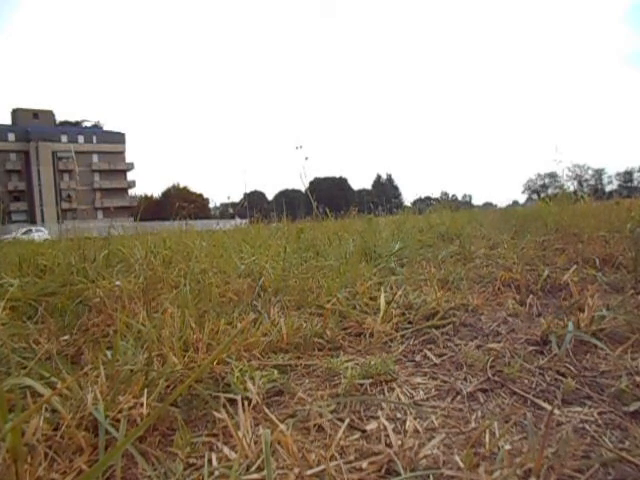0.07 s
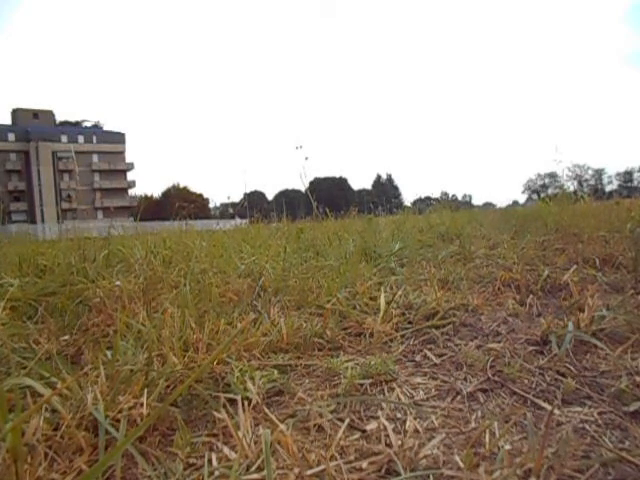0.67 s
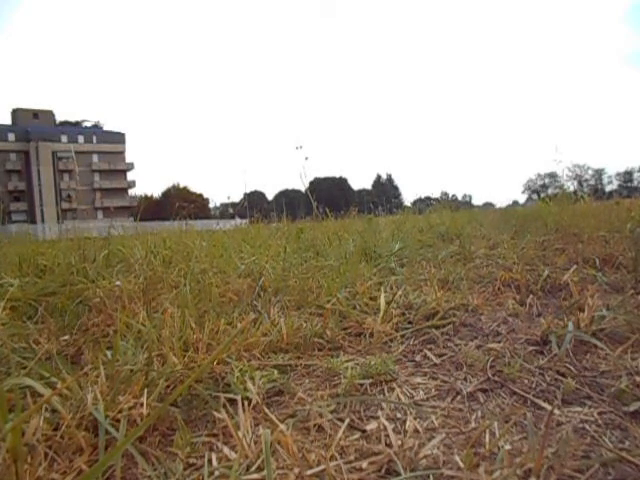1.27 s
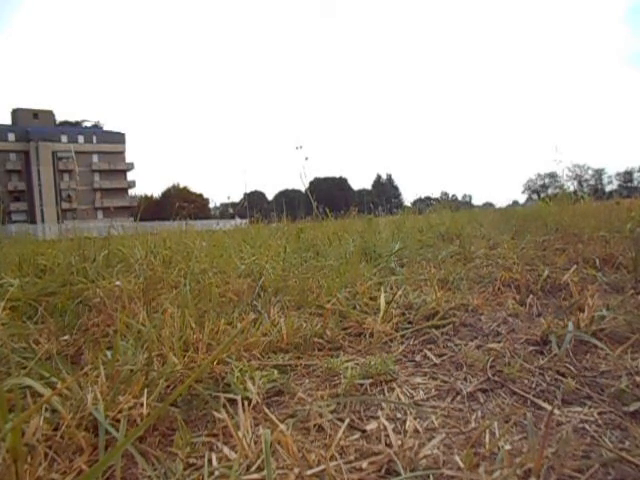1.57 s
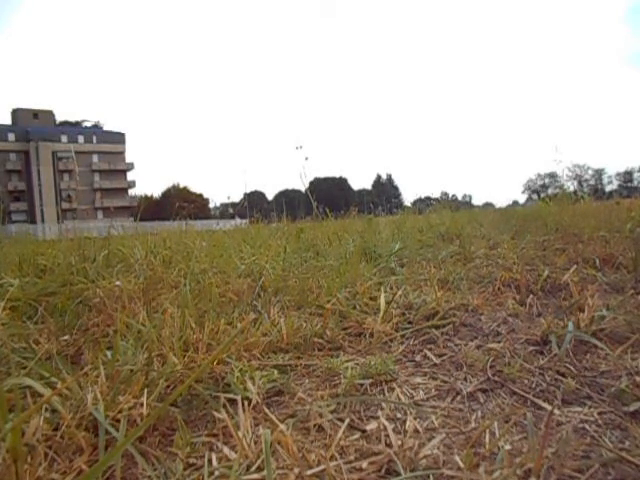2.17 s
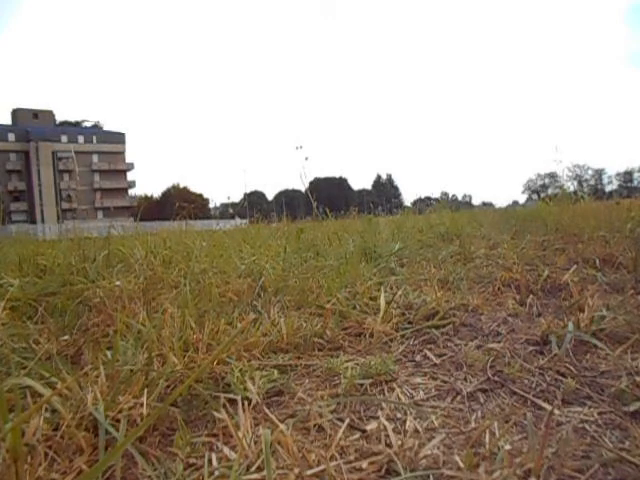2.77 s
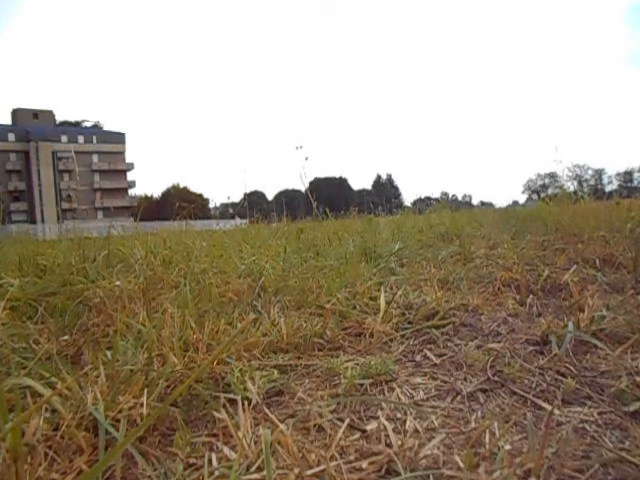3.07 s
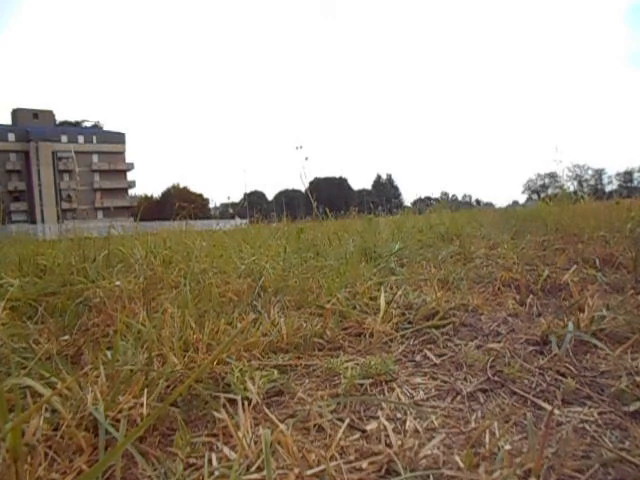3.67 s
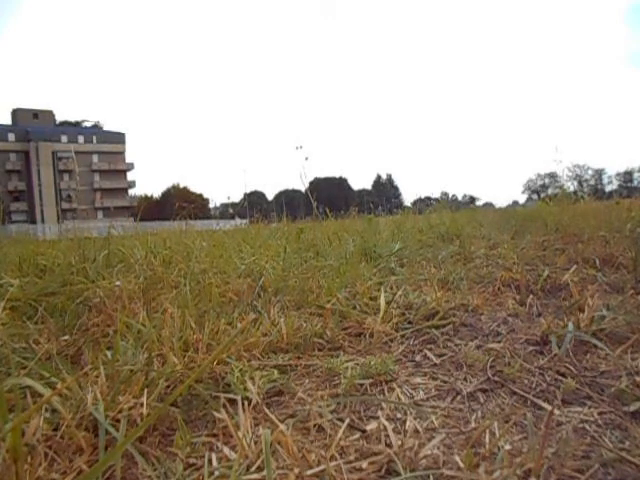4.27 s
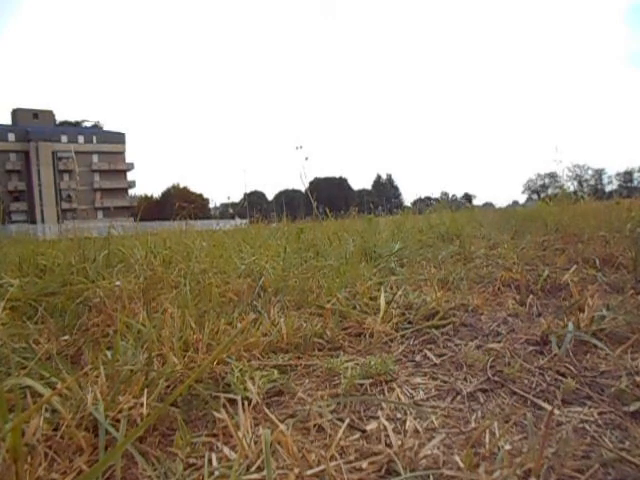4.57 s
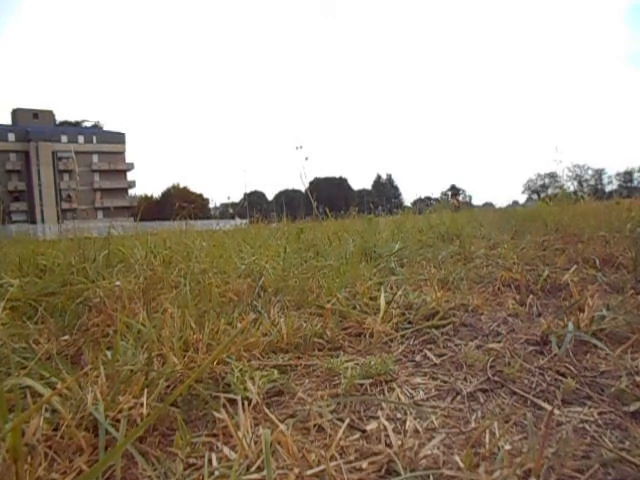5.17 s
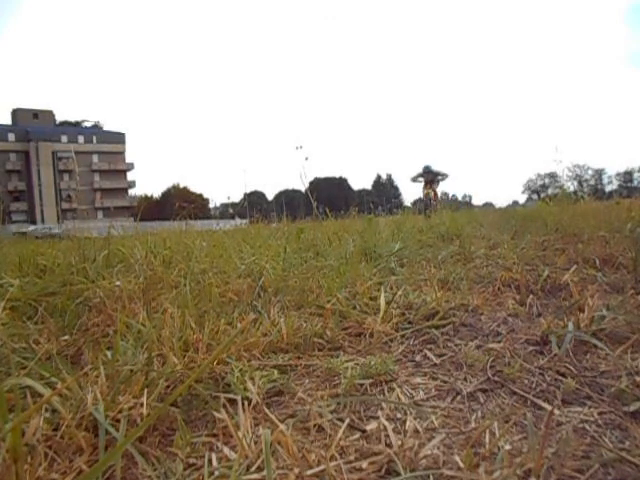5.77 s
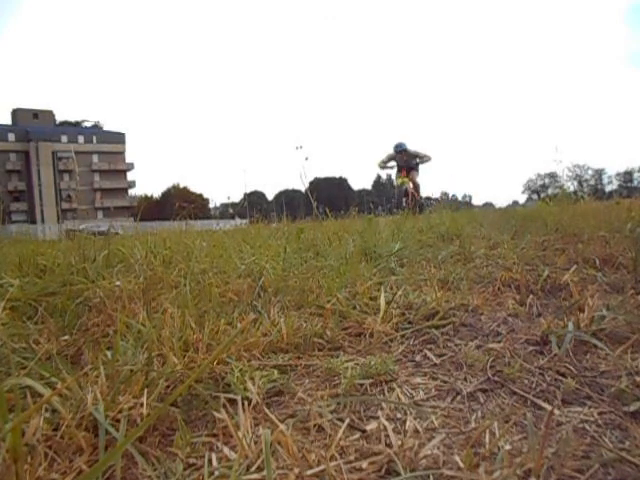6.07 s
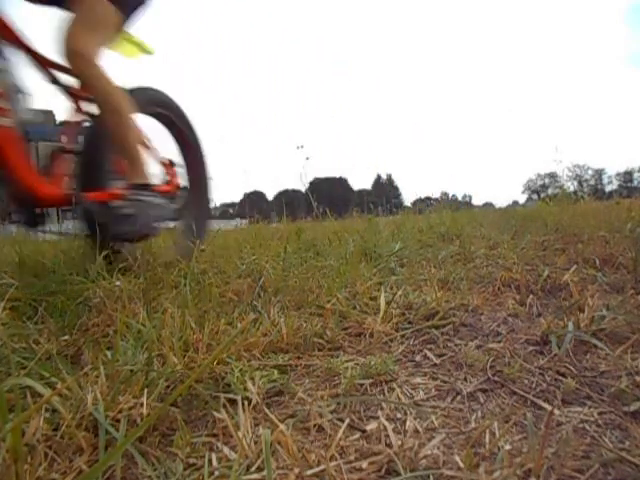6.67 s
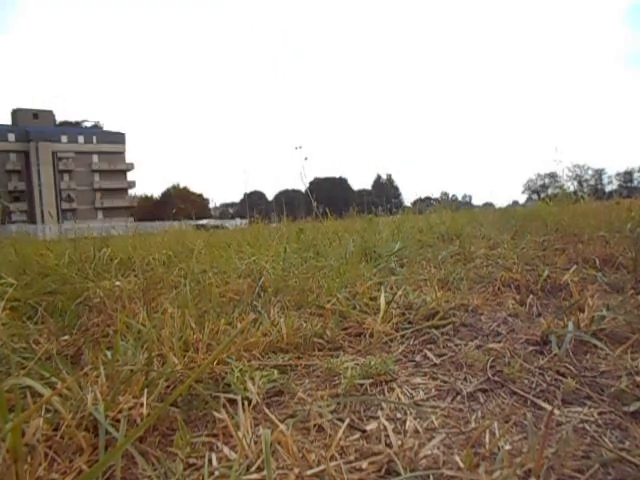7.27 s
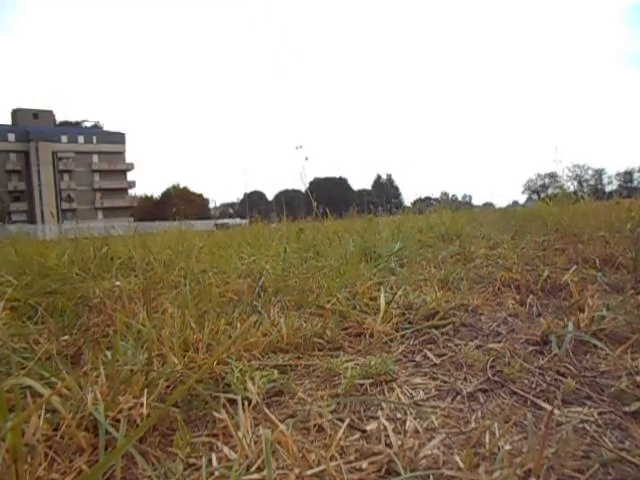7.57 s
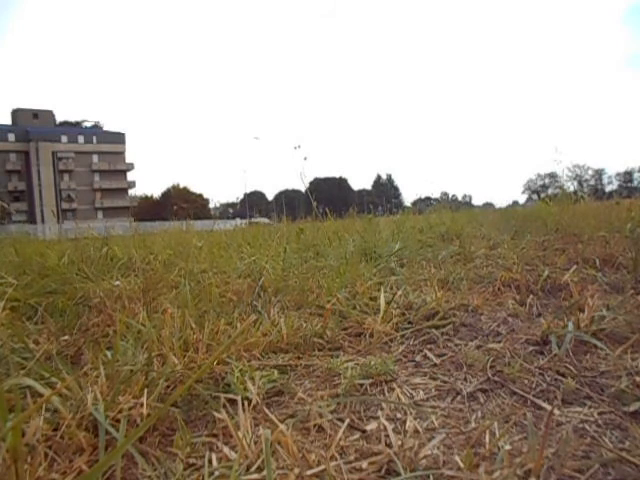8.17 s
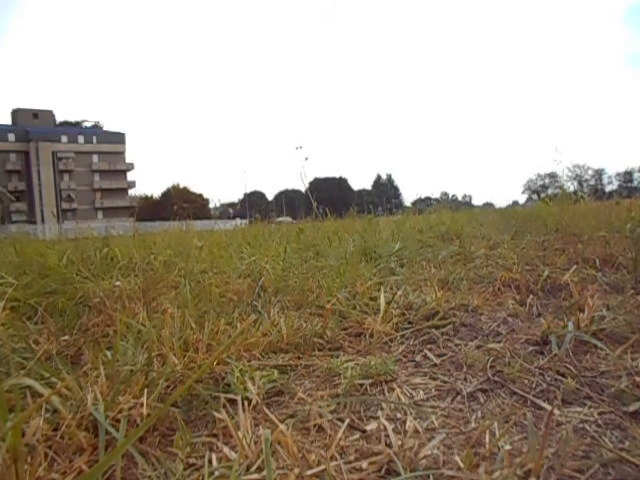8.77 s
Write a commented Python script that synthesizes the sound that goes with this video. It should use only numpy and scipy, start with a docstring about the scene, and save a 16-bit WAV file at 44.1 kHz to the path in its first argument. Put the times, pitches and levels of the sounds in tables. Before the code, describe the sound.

Far traffic and a light breeze in a field, then a bike crunches past through dry grass and rattles away.

```python
"""A field of dry grass, heard from the ground: a fat-tyred bicycle passes right beside the microphone.
Blades swish and crackle under the wheels, the air in the tyres hums, stalks snap and the freewheel ticks;
then a bump sets the frame and chain clattering and the bike is pedalled away.
Far traffic hisses and rumbles throughout under a light breeze; small gusts buffet the microphone
after the pass."""
import sys
import numpy as np
from scipy import signal
from scipy.fft import rfft, irfft, next_fast_len
from scipy.io import wavfile

SR = 44100
rng = np.random.default_rng(int(sys.argv[2]) if len(sys.argv) > 2 else 0)


def output_pcm(signal):
    """Save a mono or channel-first signal as 16-bit PCM at the path in sys.argv[1].

    Samples are clipped to [-1, 1] before scaling.
    """
    pcm = np.clip(np.atleast_2d(signal).T, -1, 1) * 32767
    wavfile.write(sys.argv[1], SR, np.round(pcm).astype(np.int16))


N = 397782


def from_db(db):
    """Decibels to gain."""
    return 10 ** (np.asarray(db) / 20)


def rms_one(x):
    """Scale to unit power."""
    return x / np.sqrt(np.mean(x ** 2) + 1e-20)


def seconds():
    """The time of every sample."""
    return np.arange(N) / SR


def ramp(start_s, length_s):
    """A straight fade from 0 to 1."""
    return np.clip((seconds() - start_s) / length_s, 0, 1)


def hump(s, half_s):
    """A bell envelope of height 1; its half length is one standard deviation."""
    return np.exp(-.5 * np.minimum(((seconds() - s) / half_s) ** 2, 100))


def swell(full_s, until_s, rise_db_per_s, fall_db_per_s):
    """Attack, hold and release, in dB relative to the held level."""
    t = seconds()
    return -rise_db_per_s * np.maximum(full_s - t, 0) - fall_db_per_s * np.maximum(t - until_s, 0)


def dying(t60):
    """Half a second of decay, falling 60 dB in t60 seconds."""
    return from_db(-60 * np.arange(SR // 2) / SR / max(t60, .001))


def noise(samples=N):
    """White noise."""
    return rng.standard_normal(samples)


def drift(rate):
    """A random modulator with about `rate` turns a second."""
    knots = noise(N // 20)
    return np.interp(seconds() * 2 * rate, np.arange(len(knots)), knots)


def crackle(per_s, spread_db, grain_s, smooth):
    """Tiny random bursts, each of its own size, over the smooth hiss of countless others."""
    sizes = from_db(spread_db * np.minimum(rng.exponential(1, N), 3.3))
    grains = sizes * (rng.random(N) < per_s / SR)
    power = signal.lfilter([1], [1, -np.exp(-1 / (grain_s * SR))], grains ** 2 + 1e-18)
    return noise() * np.sqrt(power / power.mean() + smooth ** 2)


def coloured(x, spectrum):
    """Shape a texture with an EQ curve; rms 1."""
    hz, db = np.transpose(spectrum)
    size = next_fast_len(N)
    grid = np.maximum(np.fft.rfftfreq(size, 1 / SR), 1)
    eq = from_db(np.interp(np.log(grid), np.log(hz), db))
    return rms_one(irfft(rfft(x, size) * eq, size)[:N])


def cut(x, hz, kind, order=2):
    """Butterworth low- or high-pass."""
    return signal.sosfilt(signal.butter(order, min(hz, SR / 2 - 100), kind, fs=SR, output="sos"), x)


def resonate(x, hz, width):
    """A resonance with gain 1 at its peak."""
    r = np.exp(-np.pi * width / SR)
    poles = [1, -2 * r * np.cos(2 * np.pi * hz / SR), r * r]
    return signal.lfilter(np.array([1, 0, -1]) * (1 - r * r) / 2, poles, x + 1e-18)


def band(x, hz, width):
    """The same resonance twice, for steeper skirts; rms 1."""
    return rms_one(resonate(resonate(x, hz, width), hz, width))


def body(x, modes):
    """Parallel resonances of alternating sign."""
    return sum((-1) ** k * from_db(db) * resonate(x, hz, width)
               for k, (hz, width, db) in enumerate(modes))


def add(out, s, sound):
    """Mix a sound in at a time."""
    at = int(s * SR)
    out[at:at + len(sound)] += sound[:N - at]


# EQ of the road's low rumble and of its tyre hiss: (frequency [Hz], level [dB])
RUMBLE_EQ = [(26, -34), (45, -2), (96, -9), (118, -6), (243, -5), (332, -10), (413, -9.5), (606, -17.5),
             (800, -28), (1040, -52), (1760, -120)]
ROAD_HISS_EQ = [(410, -23), (700, -11.5), (1080, -6.5), (1730, -7), (1850, -5.5), (2020, -6.5), (2940, -7),
                (3290, -7.5), (5850, -14.5), (7170, -15), (10400, -18), (13500, -57), (22000, -120)]
# A far car lifts the hiss: (time [s], boost [dB], half length [s])
CAR_SWELLS = [(3.4, 2, 0.77)]
# Drone of a far engine: (frequency [Hz], level [dB])
ENGINE_PARTIALS = [(37.7, -56.5), (75.4, -63.5), (118.4, -61.5)]


def traffic():
    """Rumble and tyre hiss of a far road swell and ebb, with the wavering low notes of an engine."""
    rumble_db = -52 + swell(full_s=2.75, until_s=3.7, rise_db_per_s=2.5, fall_db_per_s=1.5)
    cars_db = sum(db * hump(s, half) for s, db, half in CAR_SWELLS)
    hiss_db = -52 + cars_db - 2.24 * ramp(4.5, length_s=2.0)
    rumble = from_db(rumble_db + 1.23 * drift(5.6)) * coloured(noise(), RUMBLE_EQ)
    hiss = from_db(hiss_db) * coloured(noise(), ROAD_HISS_EQ)
    engine = np.zeros(N)
    for hz, db in ENGINE_PARTIALS:
        phase = 2 * np.pi * np.cumsum(hz * (1 + 0.0304 * drift(4.4))) / SR
        engine += from_db(db + 2.2 * drift(1.8)) * np.sin(phase)
    return rumble + hiss + engine


# EQ of the breeze's sizzle and of the low buffeting: (frequency [Hz], level [dB])
BREEZE_EQ = [(1500, -21), (2500, -14), (3300, -2.5), (4000, -1.5), (4800, -2.5), (5600, -10.5), (6600, -25),
             (10000, -28), (14000, -15.5)]
BUFFET_EQ = [(15, 9), (35, 3.5), (70, -4.5), (150, -7), (300, -15), (700, -66)]
# Gusts on the microphone: (time [s], level [dB], half length [s])
GUST_CUES = [(6.766, -43, .04), (6.87, -41.5, 0.036), (7.044, -49, 0.059), (7.85, -43.5, 0.042),
             (7.94, -47, 0.054), (8.1, -41, 0.022), (8.276, -51, 0.08), (8.555, -48.5, 0.04),
             (8.727, -51, .03), (8.835, -48.5, 0.046)]


def wind():
    """The breeze rises and dies in the field; gusts and the bike's wake buffet the microphone."""
    breeze_db = -52.5 + swell(full_s=1.7, until_s=4.24, rise_db_per_s=2.0, fall_db_per_s=3.0)
    sizzle = from_db(breeze_db + 0.73 * drift(11)) * coloured(noise(), BREEZE_EQ)
    draught = from_db(-61)
    gusts = sum(from_db(db) * hump(s, half) for s, db, half in GUST_CUES)
    eddies = from_db(2.5 * drift(20))
    return sizzle + (draught + gusts) * eddies * coloured(noise(), BUFFET_EQ)


# The pass-by: a straight line at steady speed, the front wheel nearest at PASS_S
PASS_S, SPEED_M_PER_S, WHEELBASE_M, NEAREST_M = 6.672, 6.5, 1.31, 0.97
ROUGH_FROM_S, ROUGH_TO_S, SOFT_TURF_DB = 6.58, 7.46, -5   # a rough stretch, then quieter turf


def travelled():
    """Metres that the front and the rear wheel have gone past the microphone."""
    front = SPEED_M_PER_S * (seconds() - PASS_S)
    return np.array([front, front - WHEELBASE_M])


def nearness(loss_db):
    """Gain of each wheel: 1 at its nearest, down by loss_db per tenfold distance over the grass."""
    distance_m = np.hypot(travelled(), NEAREST_M)
    return from_db(-loss_db * np.log10(distance_m / NEAREST_M))


def both_wheels(loss_db, front_db=0):
    """The two wheels add in power; front_db trims the front one, which bears less weight."""
    front, rear = nearness(loss_db)
    return np.hypot(from_db(front_db) * front, rear)


def behind():
    """Fade from 0 to 1 as the bike moves behind the microphone, where its sound is shaded."""
    return ramp(6.79, length_s=0.16)


def thin_patch_db():
    """A brief dip in level where the grass is thinner."""
    return -3.5 * hump(6.688, half_s=.022)


# EQ of the swish, bright ahead and hollow behind: (frequency [Hz], level [dB])
BRIGHT_SWISH_EQ = [(1180, -31), (2000, -13.5), (2860, -9), (3670, -6.5), (6600, -9), (8690, -1.5),
                   (9910, -4.5), (10400, -7.5), (13500, 4.5), (22000, -120)]
HOLLOW_SWISH_EQ = [(1180, -13), (2000, -26), (2640, -3), (2840, -6), (3360, 1), (3900, 1.5), (4230, 3),
                   (4610, 3), (5400, -2), (6100, -4), (6450, -14), (7120, 0), (8000, -7), (9380, 1),
                   (10400, -2), (13500, -19), (22000, -120)]
# The wheels plough through thicker tufts: (time [s], boost [dB], half length [s])
TUFT_SWELLS = [(4.036, 10, 0.042), (6.18, 3, 0.073), (6.413, 2, 0.033), (6.5, 2.5, 0.042),
               (6.735, 4.5, 0.05), (6.818, 2, 0.032), (6.97, 5, 0.066), (7.197, 1.5, .05), (7.638, 6, 0.11),
               (8.287, 8, 0.099)]


def grass():
    """Blades whip the tyres and spokes; the colour turns hollow once the bike is behind the microphone."""
    tufts_db = sum(db * hump(s, half) for s, db, half in TUFT_SWELLS)
    swish_db = -23 - 10.5 * behind() + tufts_db + thin_patch_db()
    blades = crackle(per_s=2200, spread_db=3.7, grain_s=.0003, smooth=.95)
    bright = from_db(3.5) * coloured(blades, BRIGHT_SWISH_EQ)
    hollow = from_db(0.5) * coloured(blades, HOLLOW_SWISH_EQ)
    hollow_share = 0.57 * behind()
    swish = (1 - hollow_share) * bright + hollow_share * hollow
    return from_db(swish_db + drift(36)) * both_wheels(loss_db=33) * swish


# EQ of crunching straw: (frequency [Hz], level [dB])
STRAW_EQ = [(400, -33), (800, -7), (1300, -5.5), (2200, -8.5), (3500, -16), (5200, -10), (6600, -18),
            (8500, -11)]
# Resonances of the tyre casing: (frequency [Hz], bandwidth [Hz], level [dB])
CASING_MODES = [(85, 58, -12.5), (292, 185, -10), (402, 257, -6), (488, 210, -6), (637, 480, -12.5)]


def tyres():
    """The tread crushes straw and drums on the uneven soil, which sounds the casing."""
    uneven = drift(17)
    straw = coloured(crackle(per_s=900, spread_db=3.0, grain_s=.001, smooth=.7), STRAW_EQ)
    straw_db = -28.5 + 2.3 * uneven - 4.5 * behind() + thin_patch_db()
    crunch = from_db(straw_db) * both_wheels(loss_db=41.5) * straw
    soil = noise()
    casing = sum(from_db(db) * band(soil, hz, width) for hz, width, db in CASING_MODES)
    roll_db = -36 + 1.1 * uneven + SOFT_TURF_DB * ramp(ROUGH_TO_S, 0.32)
    roll = from_db(roll_db) * both_wheels(loss_db=28.5, front_db=-0.5) * casing
    return crunch + roll


# Moments when the air in the tyres is struck or pulses louder: (time [s], level [dB], 60 dB decay [s])
CAVITY_CUES = [(6.246, -37.5, 0.73), (6.63, -39, .2), (6.746, -36, 0.35), (6.865, -35, .15),
               (7.075, -43, 0.27), (7.155, -41, .2), (7.281, -28, 0.098), (7.376, -45, 0.093)]
CAVITY_HZ, DOPPLER_HZ = 235, 5.5


def tyre_air():
    """The air in the tyres hums, lower after the pass; bumps strike it, it pulses through the pass, and rough
    ground swells it."""
    past_m, _ = travelled()
    pitch_hz = CAVITY_HZ - DOPPLER_HZ * past_m / np.hypot(past_m, NEAREST_M)
    phase = 2 * np.pi * np.cumsum(pitch_hz) / SR
    smooth_ground = 1 - ramp(ROUGH_FROM_S, 0.039) + ramp(ROUGH_TO_S, 0.072)
    hum_db = -42.5 - 7 * smooth_ground + SOFT_TURF_DB * ramp(ROUGH_TO_S, 0.1)
    rolling = from_db(hum_db) * both_wheels(loss_db=19.5, front_db=-0.5)
    struck = sum(from_db(db - 60 * np.maximum(seconds() - s, 0) / t60) * ramp(s, .01)
                 for s, db, t60 in CAVITY_CUES)
    # Two random gains, a quarter cycle apart, break up the hum's level and phase.
    sine_gain = rolling * drift(17)
    cosine_gain = struck * (1 + 0.39 * drift(28)) + rolling * drift(19)
    return sine_gain * np.sin(phase) + cosine_gain * np.cos(phase)


# Dry stalks breaking: (time [s], gain [dB], main decay [s], body [dB])
SNAP_CUES = [(5.879, -23.5, .012, -7), (5.99, -28, 0.064, -10), (6.089, -7.5, 0.0027, -12),
             (6.248, -24, .004, -10), (6.264, -20, .005, -12), (6.365, -20, 0.056, -7),
             (6.382, -22, 0.026, -1), (6.397, -14, 0.011, -8), (6.447, -14, .012, -9),
             (6.49, -6, 0.0057, -2), (6.4965, -5.5, 0.013, -10), (6.511, -10, .008, -13),
             (6.5392, -9, 0.018, -9), (6.561, -3.5, 0.0078, -13), (6.598, -12, .004, -11),
             (6.6175, 1, 0.0081, -15), (6.623, 0, 0.011, -15), (6.625, 0.5, 0.026, -12.5),
             (6.641, -3, 0.027, -19), (6.6657, -2, 0.01, -17), (6.712, -2, 0.0059, -18),
             (6.7192, -1.5, 0.018, -13), (6.75, -5, 0.011, -8), (6.781, -3.5, 0.012, -8),
             (6.815, -7, .007, -8), (6.828, -5, 0.02, -5.5), (6.85, -9, 0.01, -4), (6.878, -11.5, 0.016, 2),
             (6.909, -6.5, 0.0054, -3)]


def snaps():
    """A stalk gives way with a sharp crack and splinters in a short tail; thick stalks have more body."""
    out = np.zeros(N)
    for s, db, t60, body_db in SNAP_CUES:
        envelope = (1 - dying(t60=.0015)) * (dying(t60) + .25 * dying(t60 * 4))
        burst = envelope * noise(SR // 2)
        burst[np.argmax(envelope)] += from_db(5)   # the first crack
        splinters = resonate(burst, 10740, width=3000) - from_db(body_db) * resonate(burst, 3200, 3800)
        add(out, s, from_db(db) * cut(splinters, 10050, "low", order=6))
    return out


# Soft scuffs: (centre time [s], level [dB], half length [s], frequency [Hz])
SCUFF_CUES = [(6.109, -46, 0.0068, 800), (6.241, -44, .01, 500), (6.285, -48.5, 0.014, 520),
              (6.763, -36, 0.053, 1390), (6.759, -42, 0.012, 490), (6.84, -34, 0.021, 416),
              (6.948, -41, 0.018, 1150), (7.112, -44, 0.032, 580), (7.251, -38, 0.0093, 550),
              (7.386, -34.5, 0.012, 408), (8.02, -48.5, 0.018, 656), (8.246, -56.5, 0.016, 524)]


def scuffs():
    """Soft rubs on the ground: bands of noise that swell and fade."""
    out, t = np.zeros(N), np.arange(SR // 2) / SR
    for s, db, half_s, hz in SCUFF_CUES:
        rub = band(noise(len(t)), hz, width=hz * 0.58)
        envelope = np.exp(-.5 * ((t - t.mean()) / half_s) ** 2)
        add(out, s - t.mean(), from_db(db) * rub * envelope)
    return out


# Resonances of the frame and wheels: (frequency [Hz], bandwidth [Hz], level [dB])
FRAME_MODES = [(210, 100, 0.55), (426, 205, 2.1), (860, 360, 1.8), (1180, 230, 6.3), (1570, 160, 9),
               (2520, 640, 2.2), (3150, 570, 10.7), (4080, 1400, 6.5)]
# The bike jolting: (time [s], peak level [dB], low-pass cutoff [Hz])
KNOCK_CUES = [(6.496, -24, 2500), (6.625, -19.5, 2000), (6.749, -15.5, 2500), (6.8763, -20, 4500),
              (6.879, -17.5, 4800), (6.885, -19, 2500), (6.893, -22, 700), (7.289, -19, 2580),
              (7.32, -28, 1700), (7.351, -21.5, 3500), (7.385, -17, 676), (7.394, -26, 2500),
              (7.408, -24, 1700), (7.883, -37.5, 1716), (7.942, -38, 2500), (8.005, -36, 1100),
              (8.02, -35, 1100), (8.065, -30.5, 2200), (8.244, -39.5, 700)]


def knocks():
    """Jolts ring the frame and wheels, and loose parts chatter after; soft contacts are duller."""
    out = np.zeros(N)
    for s, db, cutoff_hz in KNOCK_CUES:
        contact = dying(t60=0.004) + 0.59 * noise(SR // 2) * dying(t60=0.044)
        knock = cut(body(contact, FRAME_MODES), cutoff_hz, "low")
        add(out, s, from_db(db) * knock / np.abs(knock).max())
    return out


# Dull low thuds: (time [s], gain [dB], frequency [Hz])
THUD_CUES = [(6.735, -33, 85), (6.79, -34, 85), (6.833, -29, 88), (6.892, -30, 80), (7.255, -29, 85),
             (7.797, -28, 80), (8.08, -20.5, 52.4)]


def thuds():
    """The ground thuds: a low pressure wave that dies within two cycles."""
    out, t = np.zeros(N), np.arange(SR // 2) / SR
    for s, db, hz in THUD_CUES:
        add(out, s, -from_db(db) * dying(t60=2.0 / hz) * np.sin(2 * np.pi * hz * t))
    return out


# Resonances of the rear hub: (frequency [Hz], bandwidth [Hz], level [dB])
HUB_MODES = [(3250, 1100, -7.5), (4930, 600, -2.5), (7500, 990, -11), (10000, 880, 4.5)]
COAST_FROM_S, COAST_TO_S, CLICKS_PER_S = 6.7428, 7.155, 88.4


def freewheel():
    """As the rider coasts, a pawl drops off each ratchet tooth and rings the hub, never equally hard."""
    t = seconds()
    coasting = (t > COAST_FROM_S) & (t < COAST_TO_S)
    teeth_passed = np.ceil(np.cumsum(CLICKS_PER_S * coasting) / SR)
    _, rear = nearness(loss_db=46)
    strength = from_db(-17.5 + rng.uniform(-0.15, 1, N))
    drops = np.diff(teeth_passed, prepend=0) * rear * strength
    envelope = np.maximum(signal.fftconvolve(drops, dying(t60=0.012))[:N], 0)
    return envelope * rms_one(body(noise(), HUB_MODES))


# EQ of the chain's whirr: (frequency [Hz], level [dB])
WHIRR_EQ = [(1500, -7), (3000, -21), (3450, -3), (3700, -22), (3950, -18), (4500, -6), (5500, -18)]
PEDAL_FROM_S, EASE_OFF_S = 7.26, 7.9


def chain():
    """Rollers drop onto the teeth in a fine metallic whirr; the sprockets' ring carries farther."""
    effort = ramp(PEDAL_FROM_S, .09) * from_db(-6 * ramp(EASE_OFF_S, .3))

    def fader(top_db, loss_db):
        """Gain of the drive as it recedes, top_db at its highest."""
        _, rear = nearness(loss_db)
        gain = effort * rear
        return from_db(top_db) * gain / gain.max()

    rollers = crackle(per_s=200, spread_db=3, grain_s=.002, smooth=.9)
    whirr = fader(top_db=-47, loss_db=30) * coloured(rollers, WHIRR_EQ)
    ring = fader(top_db=-53, loss_db=21) * band(rollers, hz=3750, width=360)
    return whirr + ring


# Resonances of the steel sprockets: (frequency [Hz], bandwidth [Hz], level [dB])
SPROCKET_MODES = [(3230, 820, -2), (3750, 72, 6.5), (3990, 150, 3), (4700, 560, 1.5), (6040, 820, -1.5),
                  (8070, 290, -0.5), (9070, 450, 3), (10300, 1900, -2.5)]
# The chain slaps and catches: (time [s], peak level [dB], decay scale [s], treble [dB])
CLACK_CUES = [(7.263, -35, .012, -4), (7.343, -33, .018, -2), (7.3513, -27, .013, -4),
              (7.372, -33, .03, -7), (7.3849, -22, 0.009, -11), (7.3913, -9, 0.027, 5),
              (7.4215, -23, .016, 7), (7.469, -26, .012, -2), (7.4728, -24.5, 0.026, -4),
              (7.501, -35, 0.028, -2), (7.5228, -23.5, 0.025, -5), (8.044, -36.5, 0.018, 3),
              (8.067, -35.5, .018, 0), (8.0845, -45, .014, 8), (8.1346, -30, 0.026, 3),
              (8.2681, -35, 0.064, 3)]
TREBLE_FROM_HZ = 7000


def clacks():
    """Links land in quick succession and ring the steel sprockets; each hit has its own share of the high
    modes."""
    out = np.zeros(N)
    for s, db, decay_s, treble_db in CLACK_CUES:
        envelope = dying(decay_s * 1.3) + .2 * dying(decay_s * 4)
        modes = [(hz, width, mode_db + treble_db * (hz > TREBLE_FROM_HZ))
                 for hz, width, mode_db in SPROCKET_MODES]
        for early_s, trim_db in ((0.006, -19), (0, 0)):   # loose links, then the main hit
            clack = body(noise(SR // 2) * envelope, modes)
            add(out, s - early_s, from_db(db + trim_db) * clack / np.abs(clack).max())
    return out


def rattle():
    """Cables and loose fittings chatter on the frame and sprockets as the bike shakes over the bump."""
    chatter = crackle(per_s=130, spread_db=7.5, grain_s=0.00081, smooth=0.36)
    frame = rms_one(body(chatter, FRAME_MODES))
    steel = from_db(-3) * rms_one(body(chatter, SPROCKET_MODES))
    return from_db(-46.5) * hump(7.37, half_s=0.084) * (frame + steel)


def scene():
    """The bike over a bed of traffic and wind, in mono; the open field has no echoes."""
    bike = grass() + tyres() + tyre_air() + freewheel() + chain()
    impacts = snaps() + clacks() + knocks() + rattle() + scuffs() + thuds()
    return (traffic() + bike + impacts + wind())[None]


MIC_TOP_HZ, CUTOFF_HZ = 10386, 15900
FIRST_TICK_S, TICKS_PER_S = .0067, 30.035


def record(dry):
    """The microphone drops steeply in the top treble, over its own hiss; faint, even ticks ride along."""
    treble_leak = from_db(-34.5) * cut(dry, 12300, "low", order=20)
    heard = cut(dry, MIC_TOP_HZ, "low", order=24) + treble_leak
    on_tick = np.diff(np.floor((seconds() - FIRST_TICK_S) * TICKS_PER_S), prepend=0) > 0
    ticks = from_db(2) * on_tick * noise() * np.diff(heard, prepend=0)   # scaled by the wave's slope
    hiss = from_db(-89) * noise()
    top_cut = signal.cheby2(14, 70, CUTOFF_HZ, fs=SR, output="sos")
    return signal.sosfilt(top_cut, heard + ticks + hiss)


dry = scene()
out = record(dry)
output_pcm(out)
```